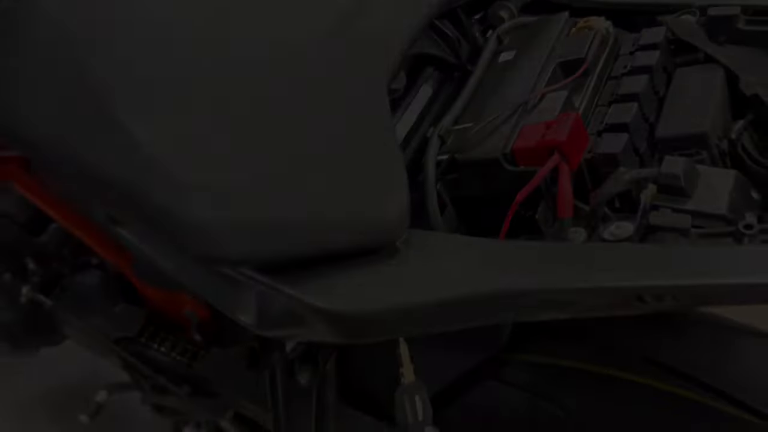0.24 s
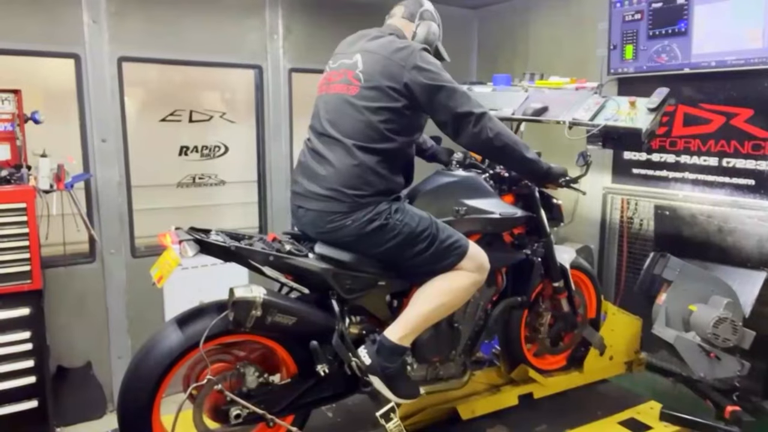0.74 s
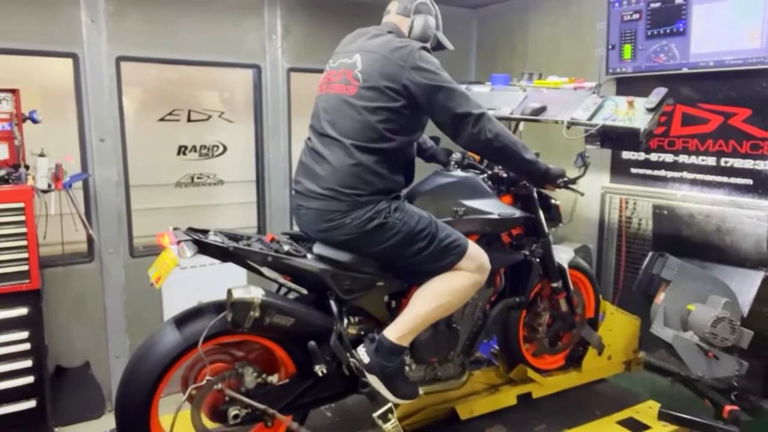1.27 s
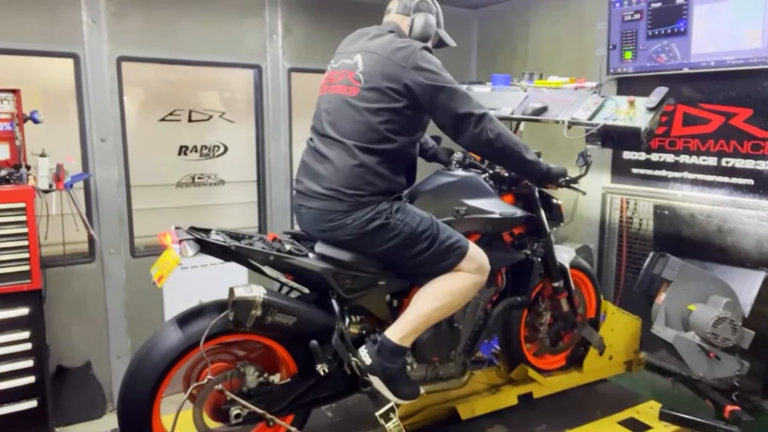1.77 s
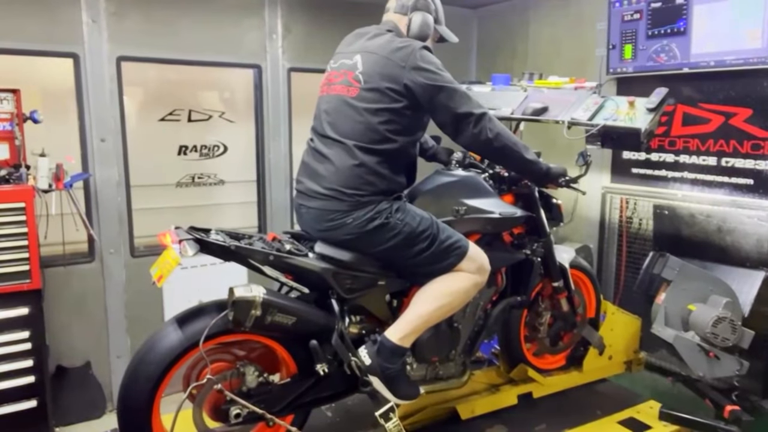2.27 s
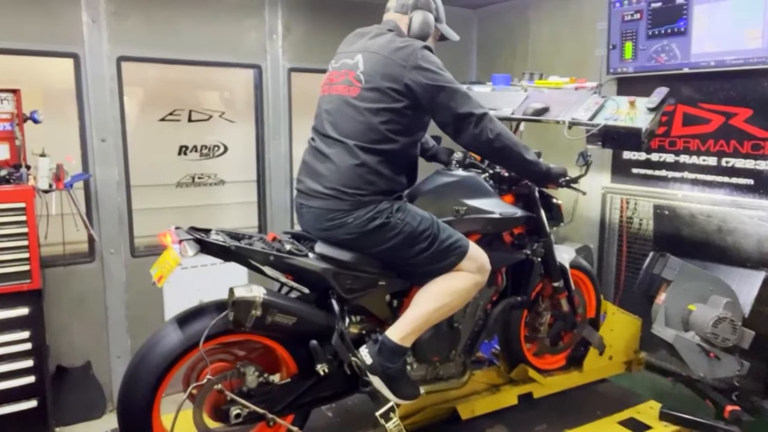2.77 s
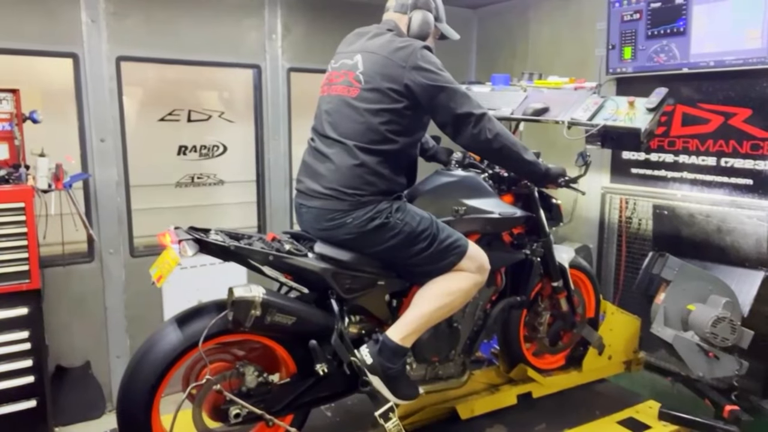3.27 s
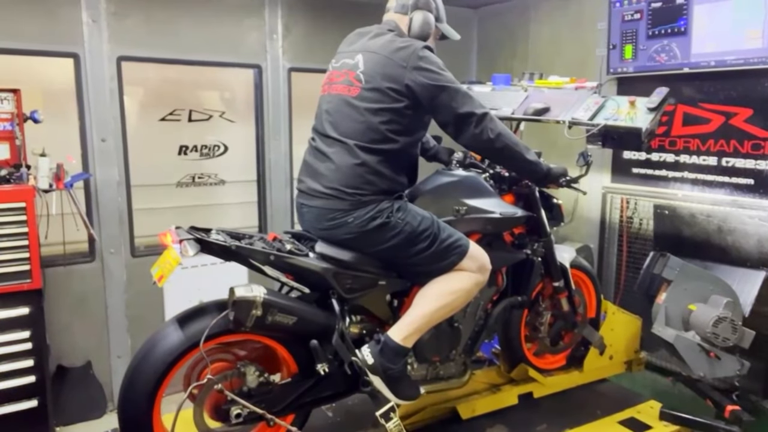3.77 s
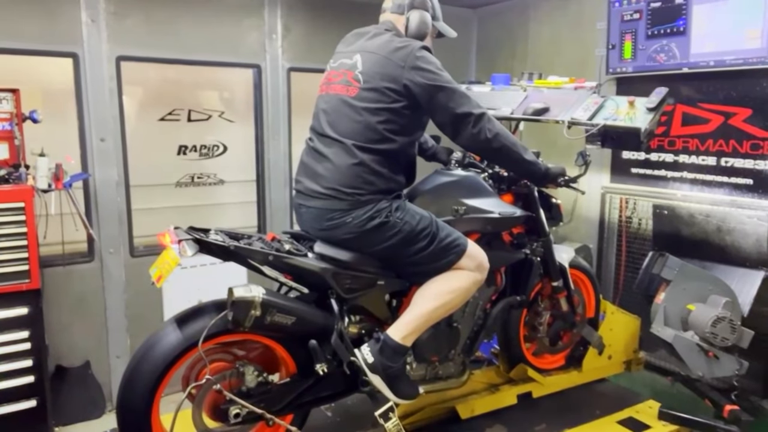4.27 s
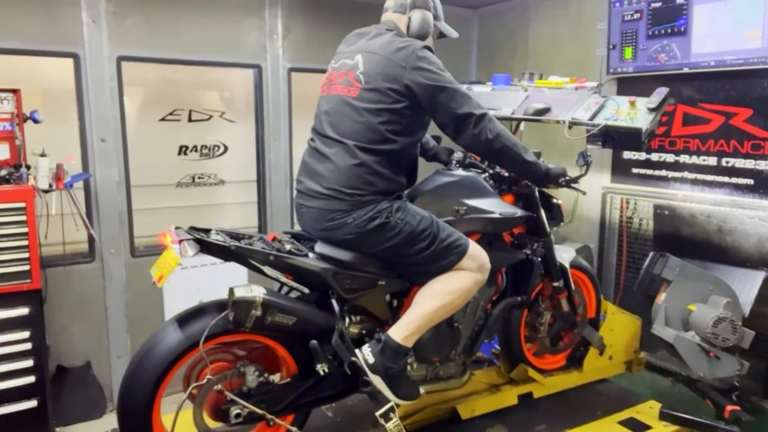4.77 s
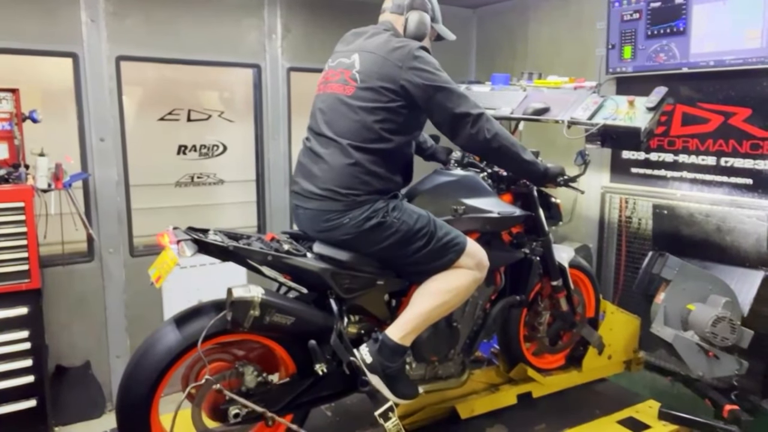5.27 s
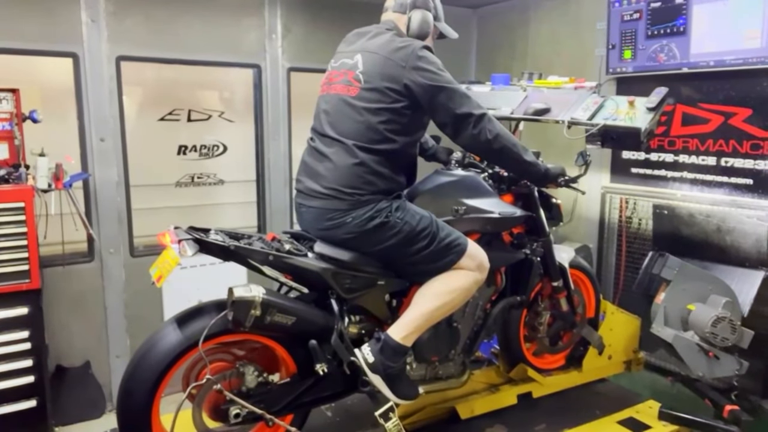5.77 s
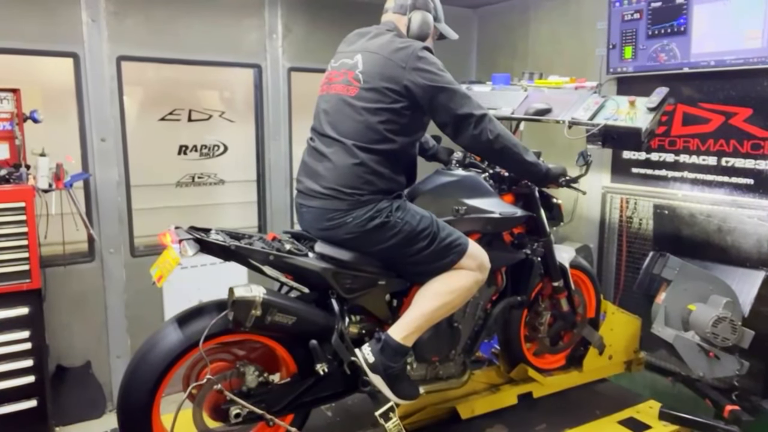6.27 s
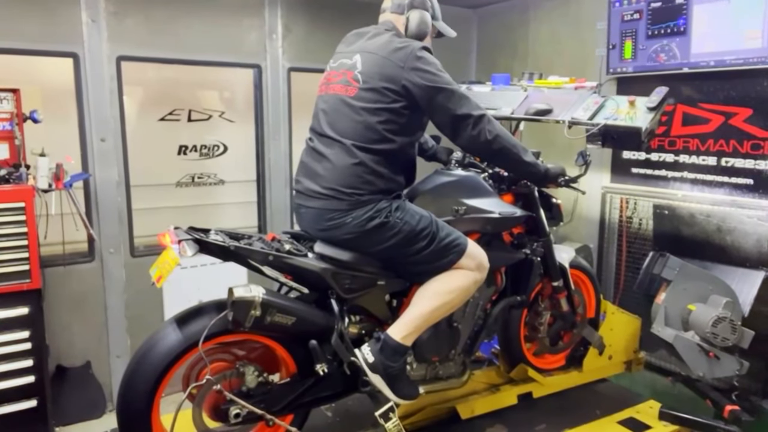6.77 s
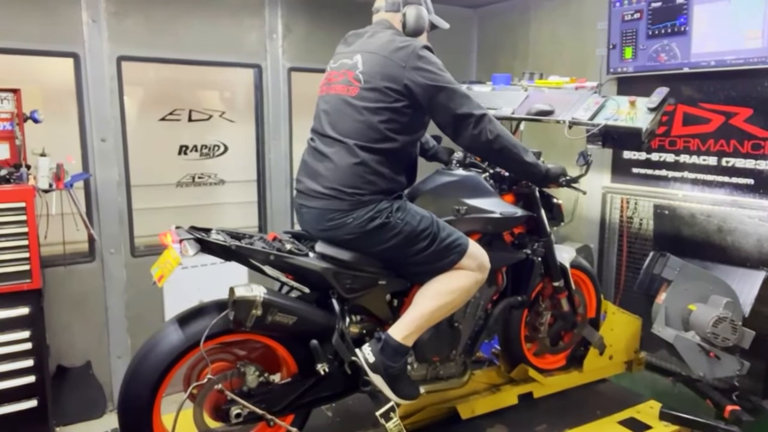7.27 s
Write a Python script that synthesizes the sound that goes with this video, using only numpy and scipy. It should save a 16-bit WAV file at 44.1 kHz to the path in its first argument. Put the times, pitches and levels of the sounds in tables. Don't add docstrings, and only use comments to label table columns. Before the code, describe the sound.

From 0 to 0.5 seconds there is only very faint ventilation, fading out, with a tiny tick near 0.3. At 0.52 a loud twin-cylinder motorcycle cuts in abruptly, already pulling at high revs: deep crank boom, uneven lumpy throb, raspy exhaust bark, thin gear whine and wide metallic clatter over a low roller rumble. Around 1.15 to 1.25 it shifts with sharp pops, and the pitch drops. Long climbs follow, with shifts near 2.45, 3.9, 5.1 and 6.45; each brings a brief cut, crackling backfires, some thudding, later ones fizzier, then the note drops and load swells back. The gear whine is much weaker after 5.1. The last cut is deepest; top gear climbs from 6.5, growing brighter and harsher around 7.3, and stops still pulling at about 7.5. The sound is close and stereo, with a short ring from hard walls.

```python
import sys
import numpy as np
from scipy import signal
from scipy.fft import rfft, irfft, next_fast_len
from scipy.io import wavfile
from scipy.ndimage import uniform_filter1d, map_coordinates

SR = 44100
rng = np.random.default_rng(int(sys.argv[2]) if len(sys.argv) > 2 else 0)


def invert_db(level):
    return 10 ** (np.asarray(level, dtype=float) / 20)


def unload_audio(sound):
    columns = np.transpose(np.atleast_2d(sound))
    steps = np.round(np.clip(columns, -1, 1) * 32767)
    wavfile.write(sys.argv[1], SR, steps.astype(np.int16))


N = 331632

# [f/Hz, level/dB per Hz]
ROOM_AIR = [(18, -27), (30, -9), (69, 4), (272, -12), (510, -4.5), (863, -26), (8030, -34), (9820, -54),
            (10900, -34), (12000, -31), (15600, -62), (22000, -120)]
# [t/s, level/dB]
ROOM_FADE = [(0, -61), (.15, -66), (.3, -68), (.4, -76), (.5, -91)]
# [f/Hz, t60/s]
CELL_DECAY = [(100, 0.13), (1000, 0.24), (8000, 0.038)]
# [f/Hz, level/dB per Hz]
ROLLER_RUMBLE = [(22, -60), (32, -7), (40, 3), (60, -3), (115, 0), (200, -7), (300, -14), (500, -16),
                 (900, -20), (1500, -27), (2500, -120)]

# [clutch bites t/s, engine cycles f/Hz, pull ends t/s, engine cycles f/Hz]
GEARS = [
    (.52, 39.5, 1.149, 46.7),
    (1.269, 33.35, 2.43, 42.9),
    (2.5, 33.68, 3.86, 42.37),
    (3.94, 34.86, 5.08, 41.12),
    (5.16, 35.05, 6.42, 40.74),
    (6.5, 35.82, 7.52, 40.22),
]
# [t/s, length/s, depth/dB]
SHIFTS = [
    (1.204, 0.043, 8),
    (2.424, 0.023, 10),
    (3.853, 0.041, 10),
    (5.05, 0.055, 11.5),
    (6.395, 0.038, 19.5),
]
LEAD_FIRING = [.642, 1.8947, 3.187, 4.5687, 5.7567, 6.9877]
# [t/s, level/dB]
TOOTH_LOAD = [(.5, -38), (1.1, -33.5), (2, -35.5), (5.05, -36.5), (5.2, -45), (7.5, -46)]
# [crank boom/dB, throb/dB, bark/dB, crack/dB, clatter/dB]
GEAR_LEVELS = [(2, 1, -1.5, -2, 1), (-1, 0, -0.5, -0.5, 1), (-2, -0.9, 0.5, 0.5, 1.5),
               (-1.5, -1.2, 1.5, 2, 1.7), (-4.5, -4, -0.05, 0.5, -0.5), (-1, -4.5, 1.5, 2.5, -0.5)]
# [engine cycles f/Hz, crank boom/dB, throb/dB, bark/dB, crack/dB]
REV_ANSWER = [(33.7, -19.5, -15.5, -24, -32), (34.64, -28.5, -12, -29.5, -32),
              (36.27, -24.5, -12, -25.5, -33.5), (38.96, -19, -16, -22.5, -29),
              (41.5, -20.5, -14, -25, -30.5), (41.1, -20.5, -11.5, -26, -30.5),
              (50.2, -11, -21, -30, -34.5)]
CUT_SHARE = [0.59, 0.62, 0.94, 0.85, 0.22]
# [boom/dB, throb/dB, bark/dB, crack/dB, clatter/dB]
SETTLE_DB = [2.3, 2.3, 3, 6.4, 0.4]
# [boom/dB, throb/dB, bark/dB, crack/dB, clatter/dB]
SURGE_DB = [-1, 1, 2, 3.5, 3.5]

FIRING_ORDERS = {1: -8, 3: -8, 4: -7.5, 5: 0, 6: -4.3, 7: -15.5, 8: 0.33}
# [start/dB, end/dB]
THIRD_ORDER_DB = (-8.5, 2)
# [start/dB, end/dB]
SECOND_CYLINDER_DB = (-1.5, -10.5)
# [t/s, peak/dB, thud/dB, sizzle/dB]
BACKFIRES = [(1.1503, -2, -3.5, -30), (1.1733, -6, -2, -24), (1.1992, -7, -5, -25), (2.4389, -12, 1, -24),
             (2.466, 0, -11, -31), (2.487, -6, -7, -24), (3.8917, -10, 2.5, -28),
             (3.9409, -13.5, 11.5, -15), (5.1262, -10.5, 3.5, -9), (5.1419, -2, -7, -15.5),
             (5.1552, -13, -7, -12), (6.4639, 0, -6, -14.5), (6.474, -8, 0, -14), (6.4836, -10, 2, -8.5),
             (6.4934, -30, -12, -16)]
# [f/Hz, level/dB per Hz]
CLATTER_MID = [(600, -2.5), (1100, -7.5), (1400, -4), (2360, -9.5), (3200, -9.5), (5300, -13.5),
               (8000, -17.5), (9400, -24.5), (10500, -33), (12600, -42), (13700, -30), (15800, -31),
               (16600, -60), (17000, -120)]
# [f/Hz, level/dB per Hz]
CLATTER_SIDE = [(600, 1), (1100, -1), (1400, -12), (2500, -12), (3200, -6.5), (4200, -7), (10100, -12.5),
                (12500, -18.5), (15800, -39), (16600, -60), (17000, -120)]

# [f/Hz, width/Hz, left/dB, right/dB, polarity, left lead/rad] Low modes of pipe and cell
BOOM_MODES = [(113.2, 16, -2, -2.5, 1, -0.059), (195.2, 26.3, 1.5, 2, -1, -0.29),
              (265.5, 15.6, -3, 0, 1, -0.9),
              (145.5, 22, -9.5, -9.5, 1, 0)]
CELL_MODES = [(83.2, 9, -5, -4, 1, -0.057)]
GEARCASE_MODES = [(3210, 140, 0, -1, 1, .6), (3300, 900, -7, -8, 1, .6)]
COVER_MODES = [(3140, 135, 5.5, 8.5, 1, .5), (5190, 700, -8, 7, -1, 0.35), (6550, 360, 5.5, -11.5, 1, 0.41)]
SILENCER_MODES = [(1275, 33, 1.8, 0, 1, 1)]
PIPE_MODES = [(310.8, 21.5, 3, -6.5, 1, -1), (338.5, 9.5, 6, 7, -1, -3.5), (411, 59.6, -16, 4, 1, 3.05),
              (455.7, 67, -1, 3, -1, 2), (519, 45, 1.5, 3.5, 1, 0.58), (639, 21.4, -12, 0, -1, 4.5),
              (755, 153, -52, 0, 1, -4), (852.2, 60.7, -0.5, -5, 1, 6.5), (860.5, 61, -2, -2, -1, -5),
              (980, 23, -44, -2.5, 1, 4.5), (1289, 55, 1, -6, 1, 1.7), (1467, 108, -1, -8, -1, 1.03),
              (1725, 176, -6.5, -31, 1, 1.8), (2300, 460, -9, -17.5, -1, 3.5),
              (2760, 200, -10.5, -22, 1, 0.5)]
PIPE_GROWTH = [-1, -11.5, 5.5, 0.5, -8, 10.5, 0, -2.5, -4.5, 6.5, 9.5, 4, 4.5, -5, -24]

SCENE_CHANGE_S = .524
LOW_HZ = 34


def unit(x):
    return x / np.sqrt(np.mean(x ** 2) + 1e-20)


def along(points, hz):
    f, v = np.transpose(points)
    return np.interp(np.log(hz + 1), np.log(f + 1), v)


def curves(rows):
    s, *cols = np.transpose(rows)
    return [np.interp(np.arange(N) / SR, s, c) for c in cols]


def wobble(rate_hz):
    knots = rng.standard_normal(int(N * rate_hz / SR) + 4)
    return map_coordinates(knots, [np.arange(N) * rate_hz / SR])


def filtered(x, response):
    m = next_fast_len(N + SR // 2)
    return irfft(rfft(x, m) * response(np.fft.rfftfreq(m, 1 / SR)), m)[..., :N]


def noise(spectrum, channels=1):
    return unit(filtered(rng.standard_normal((channels, N)), lambda hz: invert_db(along(spectrum, hz))))


def resonances(modes):
    def response(f):
        ports = np.zeros((2, len(f)), complex)
        for c, w, left_db, right_db, polarity, lead in modes:
            seen = invert_db(np.array([left_db, right_db])) * np.exp([.5j * lead, -.5j * lead])
            mode = 1j * f * w / (c * c - f * f + 1j * f * w)
            ports += np.sign(polarity) * seen[:, None] * mode
        return ports
    return response


def earlier_room():
    fade_db, = curves(ROOM_FADE)
    air = noise(ROOM_AIR) + .5 * noise(ROOM_AIR, channels=2)
    since = np.arange(N) / SR - .322
    tick_colour = [(500, -40), (1150, -1), (2000, -8), (9000, -11), (16000, -32)]
    tick = invert_db(-61 - 60 * np.abs(since) / 0.18) * (since > 0) * noise(tick_colour, channels=2)
    return invert_db(fade_db + 2 * wobble(25)) * unit(air) + tick


def cell(x):
    hz, t, z = signal.stft(rng.standard_normal((2, SR // 2)), SR, nperseg=256)
    decay = invert_db(-60 * t / along(CELL_DECAY, hz)[:, None])
    tail = signal.istft(z * decay, SR, nperseg=256)[1]
    late = np.pad(x, ((0, 0), (350, 0)))
    return signal.fftconvolve(late, tail / np.linalg.norm(tail[0]), axes=1)[:, :N]


def rollers():
    rumble_db = np.linspace(-28.5, -33, N) + 1.5 * wobble(5)
    return invert_db(rumble_db) * unit(noise(ROLLER_RUMBLE) + 0.1 * noise(ROLLER_RUMBLE, channels=2))


def revs():
    return curves([point for gear in GEARS for point in (gear[:2], gear[2:])])[0]


def crank():
    cycles = np.cumsum(revs() * (1 + .001 * wobble(25))) / SR
    angle = [cycles[round(s * SR)] for s in LEAD_FIRING]
    angle_step, = curves([(s, round(a) - a) for gear, a in zip(GEARS, angle) for s in gear[::2]])
    return cycles + angle_step


def load():
    t, hz = np.arange(N) / SR, revs()
    speeds, *layers = np.transpose(REV_ANSWER)
    level_db = [np.interp(hz, speeds, db) for db in layers]
    level_db.append(-33.5 + 0.2182 * (hz - LOW_HZ))
    gear_db = curves([(s, *pull) for gear, pull in zip(GEARS, GEAR_LEVELS) for s in gear[::2]])
    dies_s, relights_s = 0.017, 0.028
    cut_db = np.zeros(N)
    for s, length, db in SHIFTS:
        cut = np.minimum((t - s) / dies_s, (s + length - t) / relights_s + 1)
        cut_db += db * np.clip(cut, 0, 1)
    slack = sum((t > gear[0]) * np.exp(-np.abs(t - gear[0]) / 0.094) for gear in GEARS[1:])
    settle = uniform_filter1d(slack, size=800)
    surge = np.exp(-((t - 7.31) / 0.36) ** 2)
    out = np.array(level_db) + gear_db - np.outer(CUT_SHARE, cut_db)
    out += np.outer(SURGE_DB, surge) - np.outer(SETTLE_DB, settle)
    out[0] += 5 * uniform_filter1d(1. * (np.gradient(hz) < 0), size=1200)
    out[0] += 3.5 * np.exp(-(hz - LOW_HZ) / 4.1) * wobble(14)
    return out


def whine(cycles, teeth=78):
    unloaded_db, reload_s, ease_s = -20, .1, .1
    mesh = []
    for s, _, end, _ in GEARS:
        mesh += [(s, unloaded_db), (s + reload_s, 0), (end - ease_s, 0), (end + .02, unloaded_db)]
    mesh_db, = curves(mesh[1:])
    uneven = 1.2 * np.sin(2 * np.pi * cycles) + np.cumsum(50 * wobble(120)) / SR * 2 * np.pi
    level_db = curves(TOOTH_LOAD)[0] + mesh_db + .3 + 2 * wobble(12)
    tone = np.sin(2 * np.pi * teeth * cycles + uneven)
    return filtered(invert_db(level_db) * tone, resonances(GEARCASE_MODES))


def rattle(db, puff):
    mid, side = noise(CLATTER_MID)[0], noise(CLATTER_SIDE)[0]
    beat = unit(1 + 0.091 * unit(puff)) * invert_db(0.58 * wobble(16) + 0.93 * wobble(300))
    covers = unit(filtered(rng.standard_normal(N), resonances(COVER_MODES)))
    return invert_db(db + 2.5) * beat * (np.array([mid + side, mid - side]) + invert_db(-9) * covers)


def backfires():
    crack, thud, sizzle = np.zeros(N + SR), np.zeros(N + SR), np.zeros((2, N + SR))
    knock = np.zeros(N)
    t = np.arange(SR // 8) / SR
    burst = invert_db(-60 * t / .02) + .2 * invert_db(-60 * t / .14)
    for s, db, thud_db, sizzle_db in BACKFIRES:
        i = round(s * SR)
        crack_db = db + 15 + .5 * (sizzle_db + 14)
        crack[i:][:len(t)] += invert_db(crack_db - 60 * t / 0.02) * rng.standard_normal(len(t))
        knock[i] = invert_db(db + 31)
        thud[i] = invert_db(db + thud_db + 34)
        hiss = rng.standard_normal(len(t)) + 0.49 * rng.standard_normal((2, len(t)))
        sizzle[:, i:][:, :len(t)] += invert_db(db + sizzle_db + 10.5) * burst * hiss
    tube, lowest = resonances(PIPE_MODES), resonances(CELL_MODES)

    def sizzle_band(f):
        return 1j * f / (1500 + 1j * f) / (1 + 1j * f / 4500) ** 2 / (1 + (f / 9500) ** 8)

    high = filtered(crack[:N], lambda f: tube(f) * f * f / (f * f + 1100 ** 2))
    low = filtered(thud[:N], lambda f: tube(f) / (1 + 1j * f / 600) + invert_db(7.5) * lowest(f))
    ring = filtered(knock, resonances(SILENCER_MODES))
    return high + low + ring + filtered(sizzle[:, :N], sizzle_band)


def throb(cycles, boom_db, db):
    orders = np.zeros(N)
    for k, level_db in FIRING_ORDERS.items():
        grown_db = np.linspace(*THIRD_ORDER_DB, N) if k == 3 else 0
        level_db = level_db + grown_db + 1.2 * wobble(9)
        orders += invert_db(level_db) * np.cos(2 * np.pi * k * cycles)
    boom = invert_db(boom_db + 4.5) * np.sin(4 * np.pi * cycles + [[-.05], [.05]])
    boom = boom * invert_db(np.array([[-.7], [.7]]))
    swell = unit(filtered(invert_db(db) * orders, resonances(BOOM_MODES)))
    ring = filtered(boom.mean(axis=0), resonances(CELL_MODES))
    return swell * invert_db(np.mean(db)) + invert_db(-4) * boom + ring


def pipe(x, high_revs):
    def grown(part):
        return [(c, w, left + part * db, right + part * db, *rest)
                for (c, w, left, right, *rest), db in zip(PIPE_MODES, PIPE_GROWTH)]
    slow = filtered(x * (1 - high_revs), resonances(grown(-0.38)))
    return slow + filtered(x * high_revs, resonances(grown(0.51)))


def bark(cycles, db, crack_db):
    late, scatter_db, jitter_s = .619, .8, .00004
    beats = np.arange(1, cycles[-1])
    luck = rng.standard_normal((len(beats), 4))
    second_db = np.linspace(*SECOND_CYLINDER_DB, len(beats))
    fronts = np.zeros(N + SR)
    for lag, size_db, a, b in ((0, 0, 0, 1), (late, second_db, 2, 3)):
        at = np.interp(beats + lag, cycles, np.arange(N)) + jitter_s * SR * luck[:, a]
        fronts[np.abs(at).astype(int)] += invert_db(size_db + scatter_db * luck[:, b])
    fronts, t = fronts[:N], np.arange(SR // 20) / SR
    puff = signal.fftconvolve(fronts, invert_db(-60 * t / 0.06) * (1 - np.exp(-t / 0.012)))[:N]
    speed_hz = uniform_filter1d(np.gradient(cycles), size=2000) * SR
    high_revs = np.clip((speed_hz - LOW_HZ) / 9, 0, 1)

    def edge(f):
        return 1 / (1 + (1000 / (f + 1)) ** 6)

    body = filtered(invert_db(db) * fronts, lambda f: 1 - edge(f))
    rounded = unit(filtered(fronts, lambda f: 1 / (1 + 1j * f / 2340) ** 2))
    gas_db = -8 + crack_db - crack_db.mean()
    steep = rounded * 3 + invert_db(gas_db) * unit(puff * rng.standard_normal(N))
    crack = filtered(invert_db(crack_db) * steep, edge)
    low, high = unit(pipe(body, high_revs)), unit(pipe(crack, high_revs))
    return low * invert_db(np.mean(db) + 3.0) + high * invert_db(np.mean(crack_db) + 1.4), puff


def scene():
    cycles = crank()
    boom_db, throb_db, bark_db, crack_db, rattle_db = load()
    fronts, puff = bark(cycles, bark_db, crack_db)
    pops = backfires()
    walls = invert_db(-16) * cell(fronts) + invert_db(-9.5) * cell(pops)
    engine = throb(cycles, boom_db, throb_db) + fronts + pops + walls
    engine += rattle(rattle_db, puff) + whine(cycles) + rollers()
    t = np.arange(N) / SR
    gate = np.clip((t - SCENE_CHANGE_S) / 0.00058, 0, 1)
    ending = invert_db(-2.5 * np.clip(1 - (t[-1] - t) / .06, 0, 1))
    return gate * engine * ending + (1 - gate) * earlier_room()


def low_pass(x):
    return signal.sosfilt(signal.butter(12, 16980, fs=SR, output="sos"), x)


def record(dry):
    soft = dry / (1 + np.abs(dry / 0.99) ** 4) ** (1 / 4)
    mix = filtered(soft, lambda hz: hz < 16100)
    return low_pass(mix)


dry = scene()
out = record(dry)
unload_audio(out)
```